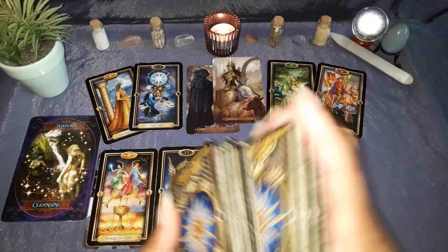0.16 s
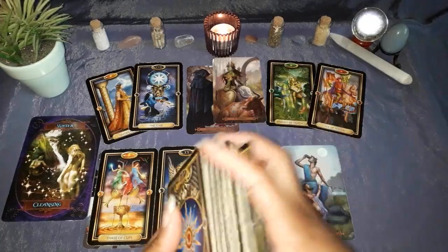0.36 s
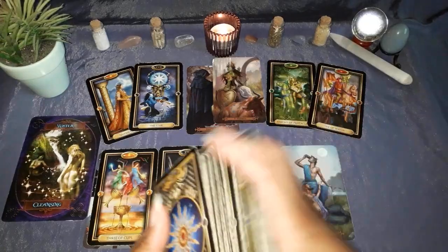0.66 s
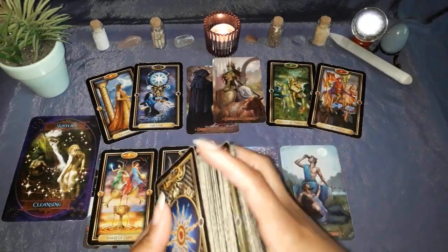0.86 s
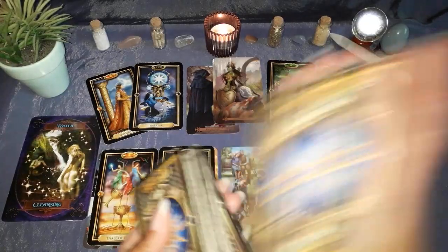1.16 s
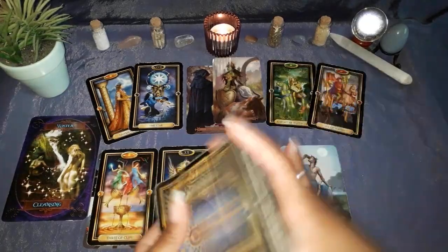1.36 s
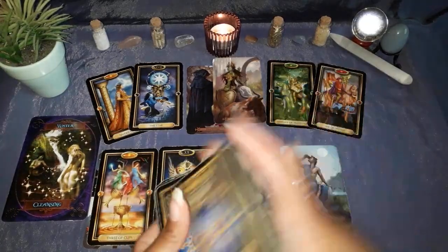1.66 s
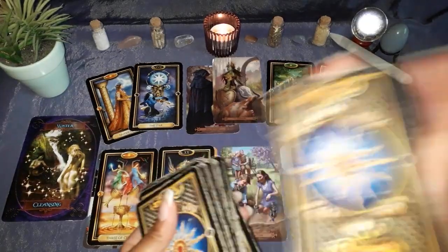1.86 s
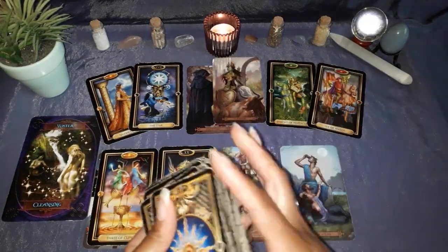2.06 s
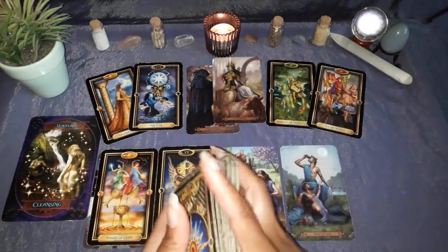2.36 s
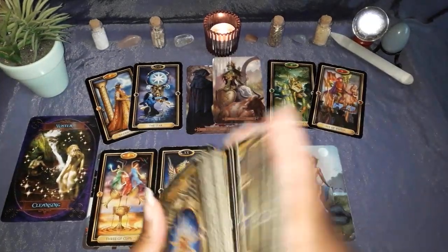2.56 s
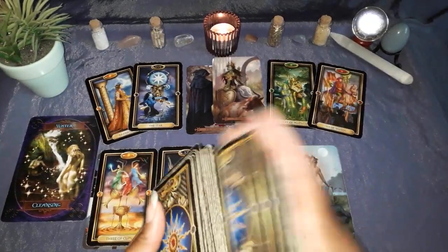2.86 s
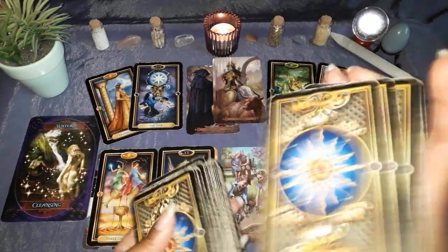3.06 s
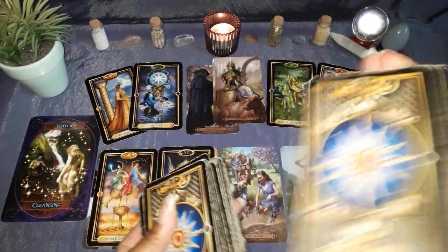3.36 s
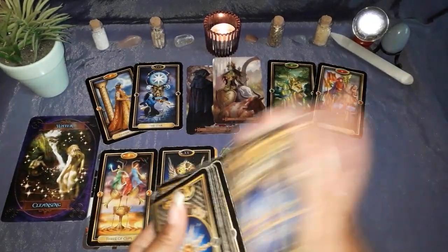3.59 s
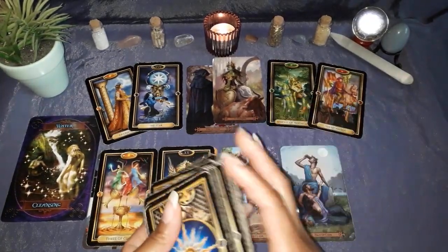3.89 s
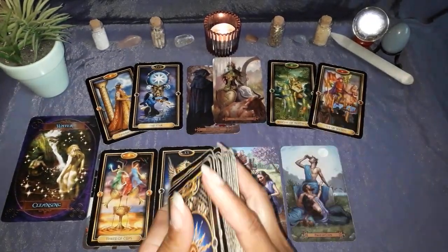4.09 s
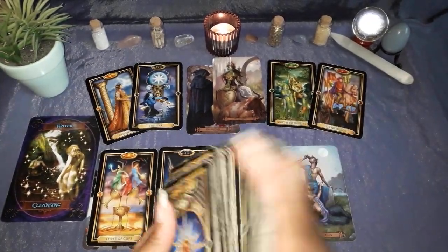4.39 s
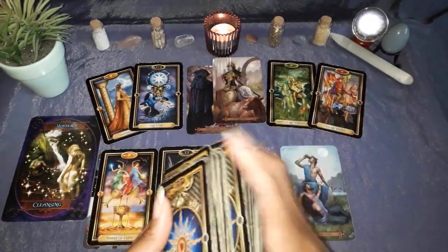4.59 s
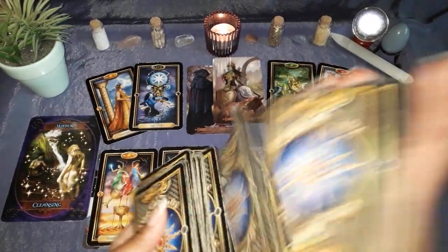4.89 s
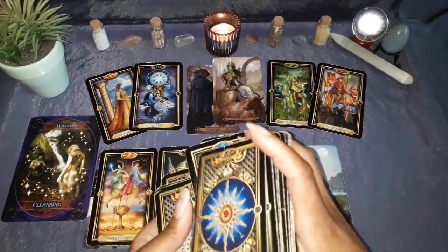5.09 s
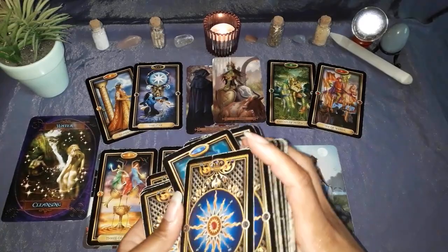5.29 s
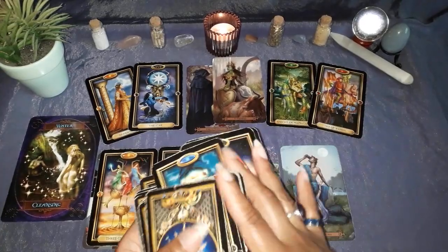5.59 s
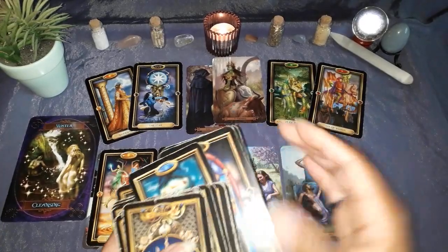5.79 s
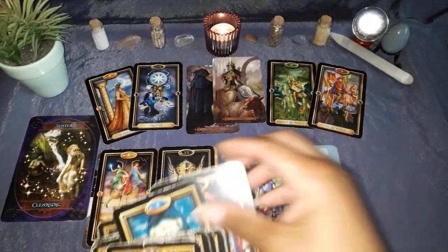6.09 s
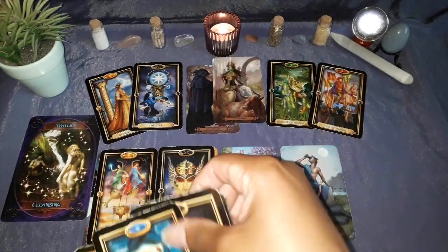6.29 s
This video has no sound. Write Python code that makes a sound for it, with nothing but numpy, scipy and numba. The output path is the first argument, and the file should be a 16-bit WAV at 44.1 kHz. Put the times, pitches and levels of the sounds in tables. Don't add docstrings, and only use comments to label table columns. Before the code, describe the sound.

Stiff cards are shuffled by hand up close, snapping and clacking in uneven bursts with papery scrapes, over faint room hum and distant traffic.

```python
import sys
import numpy as np
from scipy import signal
from scipy.fft import rfft, irfft, next_fast_len
from scipy.io import wavfile
from scipy.ndimage import uniform_filter1d
from numba import njit

SR = 44100
rng = np.random.default_rng(int(sys.argv[2]) if len(sys.argv) > 2 else 0)


def amplitude_ratio(level_db):
    exponent = np.asarray(level_db, float) / 20
    return 10 ** exponent


def waveform_to_disk(signal):
    frames = np.transpose(np.atleast_2d(signal))
    scaled = np.clip(frames, -1, 1) * 32767
    samples = np.round(scaled).astype(np.int16)
    wavfile.write(sys.argv[1], SR, samples)


N = 284133
TIME = np.arange(N) / SR


def unit(x):
    return x / np.sqrt(np.mean(x ** 2))


def colour(x, spectrum):
    size = next_fast_len(len(x))
    hz, db = np.transpose(spectrum)
    bins = np.maximum(np.arange(size // 2 + 1) * SR / size, 1)
    gain = amplitude_ratio(np.interp(np.log(bins), np.log(hz), db))
    return irfft(rfft(x, size) * gain, size)[:len(x)]


def band(x, lo_hz, hi_hz, order=2):
    edges_hz = [lo_hz, min(hi_hz, .45 * SR)]
    return signal.sosfilt(signal.butter(order, edges_hz, "band", fs=SR, output="sos"), x)


def walk(rate):
    hold = int(SR / rate)
    steps = np.repeat(rng.standard_normal(N // hold + 1), hold)
    smooth = uniform_filter1d(uniform_filter1d(steps, hold), hold)
    return unit(smooth[:N])


def ring(t, hz, t60):
    return np.sin(2 * np.pi * hz * t) * amplitude_ratio(-60 * t / t60)


def packet_drops():
    # (time [s], peak level [dB], slot ring [Hz], tick level [dB], rustle level after [dB])
    drops = [(1.077, -53, 1750, 9, -25), (1.1336, -26, 1820, -9, -37), (1.1453, -20.5, 1860, -9.5, -14),
             (1.1444, -21, 5720, -21, -26), (1.3174, -15.5, 1740, -18, -10),
             (1.3238, -18, 1510, -12.5, -19), (1.4282, -30.5, 1810, -7.5, -14),
             (1.4377, -34.5, 1410, -28, 1), (1.6261, -26.5, 1790, -8, -11),
             (1.6332, -16, 1660, -12.5, -12.5), (1.9579, -28.5, 2060, 2.5, -7),
             (2.9824, -38.5, 2190, 3, -2), (2.9964, -21.5, 1690, -23, -8), (3.1557, -18.5, 1740, -10, -10),
             (3.1661, -21.5, 1720, -16, -3), (3.1996, -21.5, 2320, -5, -21),
             (3.2994, -35.5, 1360, -17, -23), (3.472, -26, 2080, -10, -1.5),
             (3.4773, -22.5, 1460, -3.5, -19), (3.6036, -34.5, 3200, -34, -2),
             (5.0117, -8.5, 1760, -20, -13), (5.0171, -10.5, 1790, -3.5, -16),
             (5.0413, -26, 1810, -15, -12), (6.1562, -58.5, 1530, -17, 14.5)]
    return [(s, db, hz, -11.5 - 0.67 * (db + 20), tick_db, rustle_db) for s, db, hz, tick_db, rustle_db in drops]


def flicks():
    # (time [s], peak level [dB], slot ring [Hz], rustle level after [dB])
    flicked = [(1.1129, -29.5, 1850, -20), (1.359, -18, 1740, -17), (1.413, -25, 1000, -22),
               (1.64, -39, 1650, -20), (1.6551, -23, 1990, -24), (1.7292, -36, 2130, -8.5),
               (1.7425, -20, 2360, -16), (1.931, -13, 1990, -9), (2.6928, -32.5, 4340, -14.5),
               (3.0221, -33.5, 1140, -8.5), (3.2122, -26.5, 1370, -26), (3.2826, -38, 2470, -15),
               (3.5124, -23, 2280, -7.5), (3.5503, -20.5, 2110, -15.5), (3.5754, -31.5, 4370, -7.5),
               (3.7486, -27.5, 2140, -16.5), (3.768, -40, 1960, -5), (3.8104, -40, 1730, -3.5),
               (4.025, -33.5, 2560, -15), (4.9637, -37, 1740, -10), (4.9846, -31, 1650, -12.5),
               (4.9988, -32, 1710, -14.5), (5.0519, -19.5, 1540, -16), (5.0568, -23, 1430, -10),
               (5.4079, -34.5, 1840, -14), (5.4983, -26, 1580, -26), (5.5535, -39, 1640, -20),
               (5.5975, -37.5, 4600, -9), (5.608, -32.5, 2130, -14), (6.1882, -26, 1870, -20)]
    return [(s, db, hz, -22.5, -18 + (rustle_db + 15), rustle_db) for s, db, hz, rustle_db in flicked]


def catches():
    # (time [s], peak level [dB], slot ring [Hz], tick level [dB])
    caught = [(0.3727, -44.5, 1430, -8.5), (0.422, -44.5, 1330, -10.5), (0.4894, -51, 1870, -16),
              (0.537, -44, 1040, -27), (0.6868, -52.5, 1670, 8), (0.881, -48.5, 1600, -7),
              (0.904, -51, 1720, 1), (1.218, -46, 1320, -2), (1.9838, -34, 1740, -4.5),
              (2.119, -46, 2340, 4.5), (2.2968, -41.5, 1160, -10.5), (2.4421, -52.5, 1150, 3),
              (2.619, -54, 1230, 4), (2.6465, -39, 4420, -13), (2.6656, -45, 5830, -8),
              (2.8637, -49, 1450, -1.5), (2.8804, -43, 2030, -8), (2.9571, -55, 1220, 9),
              (3.262, -46, 2370, 5), (3.277, -35, 2030, 1), (3.793, -50.5, 1500, 11),
              (3.9494, -44.5, 2200, -3.5), (4.0047, -49, 2240, 10), (4.5296, -45, 2060, -8),
              (4.7696, -59, 1910, 7), (4.7107, -46, 2240, -13), (4.7292, -42.5, 1920, -5),
              (4.8514, -42.5, 1900, 8), (5.649, -43, 1900, -13), (6.1814, -38, 1860, -16)]
    return [(s, db, hz, -13.5, tick_db, -8) for s, db, hz, tick_db in caught]


def packet_edges(chance):
    edges = np.zeros(1024)
    delay = np.cumsum(0.002 * (.2 + chance[1:5]))
    at = np.minimum(delay * SR, 1023).astype(int)
    edges[at] = amplitude_ratio(-9 - 1000 * delay - 6.6 * chance[5:9]) * np.sign(chance[5:9] - .5)
    edges[0] = 1
    return edges


def snaps():
    # (frequency [Hz], level [dB], decay time T60 [s])
    thud_modes = [
        (172, -14.5, 0.02),
        (268, -22, 0.069),
        (548, -2.5, 0.024),
        (660, 10, 0.008),
    ]
    # (frequency [Hz], level [dB], decay time T60 [s])
    upper_modes = [
        (3980, -7.5, 0.0087),
        (7590, -8, 0.0053),
    ]
    slot_t60_s, contact_s = .01, 0.0007
    rustle_t60_s, rustle_rise_s = .075, 0.001

    t = np.arange(2048) / SR
    tick = band(t == 0, 6660, 13360)
    tick = tick / np.abs(tick).max()
    knocks, starts = np.zeros(N + 4096), np.zeros((2, N))
    for s, db, hz, thud_db, tick_db, rustle_db in packet_drops() + flicks() + catches():
        c = rng.random(16)
        slot = ring(t, hz, slot_t60_s) + 1.2 * ring(t, hz * (0.88 + 0.34 * c[10]), 0.36 * slot_t60_s)
        slot = slot * np.minimum(t / contact_s, 1)
        upper = sum(amplitude_ratio(g) * ring(t, f * (0.86 + 0.35 * c[11 + k]), d)
                    for k, (f, g, d) in enumerate(upper_modes))
        thud = sum(amplitude_ratio(g) * ring(t, f * (0.872 + 0.34 * c[12 + k]), d)
                   for k, (f, g, d) in enumerate(thud_modes))
        body = 0.9 * slot + amplitude_ratio(thud_db - 3.5) * thud
        body = body + amplitude_ratio(tick_db + 11) * tick + amplitude_ratio(0.5 * tick_db + 7.0) * upper
        at = int(s * SR)
        knocks[at:at + 3071] += amplitude_ratio(db) * signal.fftconvolve(packet_edges(c), body)
        brightness_db = np.array([0, 0.63 * (tick_db + 4.5)])
        starts[:, at] += amplitude_ratio(db + rustle_db + brightness_db) ** 2
    fade = amplitude_ratio(-120 / (rustle_t60_s * SR))
    rise = np.exp(-1 / (rustle_rise_s * SR))
    rustle_power = signal.lfilter([1 - rise], np.convolve([1, -fade], [1, -rise]), starts)
    return knocks[:N], np.sqrt(rustle_power)


def grit(flicker_db=1.5):
    # (frequency [Hz], level [dB])
    card = [(180, -40), (300, -5), (870, -7), (1480, -2.5), (1610, -2), (1780, -2), (2360, -2.5),
            (3030, -10), (4440, -4), (5900, -9.5), (10400, -8), (14500, -25.5), (16000, -49)]
    slips = np.minimum(rng.exponential(size=N // 8 + 1), 3.5).repeat(8)[:N]
    clicks = rng.standard_normal(N) * amplitude_ratio(2.5 * slips + flicker_db * walk(90))
    sound = unit(colour(clicks, card))
    body = signal.sosfilt(signal.butter(2, 3200, fs=SR, output="sos"), sound)
    return body, sound - body


def sliding(rustle):
    # (middle [s], level [dB], length [s], treble level [dB])
    scrapes = [(0.071, -51.5, 0.042, -0.5), (3.562, -54.5, 0.038, 6.5), (1.398, -54.5, 0.038, 8),
               (0.271, -44.5, 0.022, 1.5), (0.486, -57, 0.011, 1), (0.66, -61, 0.022, 0.5),
               (0.817, -48.5, 0.017, 4), (0.908, -56.5, 0.024, -2.5), (1.022, -49, 0.025, -4.5),
               (1.11, -42, 0.021, -1.5), (1.168, -48.5, 0.025, 2.5), (1.348, -33, 0.0083, 1),
               (1.434, -44.5, 0.0047, 7.5), (1.667, -53.5, 0.02, 6), (3.266, -65, 0.051, 9.5),
               (2.122, -59, 0.0043, 9), (2.677, -65, 0.013, 5), (2.995, -51, 0.017, 3.5),
               (3.201, -38, 0.021, -5), (3.275, -52, 0.013, 7), (3.808, -60, 0.034, 4),
               (4.008, -53.5, 0.035, -1), (4.422, -61.5, 0.024, 4), (4.588, -52.5, 0.026, -4),
               (6.312, -59, 0.06, -2), (4.856, -54, 0.015, 6.5), (5.042, -36, 0.0079, -0.5),
               (5.449, -41.5, 0.031, -8), (5.491, -41, 0.013, -8), (5.611, -51, 0.026, -6)]
    # (time [s], level [dB])
    handling = [(0.14, -68.5), (0.8, -71), (1.0, -61.5), (1.14, -69), (1.3, -91), (1.9, -93),
                (2.121, -51.5), (2.3, -65), (2.98, -63.5), (3.14, -81), (3.75, -82), (3.95, -63),
                (4.68, -74), (4.82, -56.5), (5.12, -77), (5.34, -64.5), (5.53, -56.5), (5.75, -94)]
    s, level_db = np.transpose(handling)
    treble_db = -2 + 0.34 * (level_db + 61.5)
    held = amplitude_ratio(np.interp(TIME, s, level_db, left=-99, right=-99))
    held = held * amplitude_ratio(4 * walk(11))
    held_treble = held * amplitude_ratio(np.interp(TIME, s, treble_db))
    power = np.array([held, held_treble]) ** 2 + rustle ** 2
    for mid, db, length, bright_db in scrapes:
        span = slice(max(int((mid - 4 * length) * SR), 0), int((mid + 4 * length) * SR))
        swell = np.exp(-((TIME[span] - mid) / length) ** 2)
        power[:, span] += np.outer(amplitude_ratio(np.array([db, db + bright_db])) ** 2, swell)
    return np.sum(np.sqrt(power) * grit(), axis=0)


def table_bumps():
    # (time [s], level [dB], frequency [Hz], decay time T60 [s])
    bumps = [
        (.275, -43, 140, .04),
        (1.072, -38, 118, .06),
        (1.1430, -26, 520, .02),
        (1.6290, -33, 270, .04),
        (1.7435, -39, 2500, .15),
        (4.53, -44, 210, 0.045),
    ]
    t = np.arange(4096) / SR
    thumps = np.zeros(N + 4096)
    for s, db, hz, t60 in bumps:
        at = int(s * SR)
        thumps[at:at + len(t)] += amplitude_ratio(db) * ring(t, hz, t60) * np.minimum(t / 0.002, 1)
    return thumps[:N]


@njit
def walls(x, lags, gain, damp):
    line, soft, out = np.zeros((8, 4096)), np.zeros(8), np.zeros(len(x))
    for i in range(len(x)):
        total = 0.
        for k in range(8):
            soft[k] += (1 - damp) * (gain[k] * line[k, (i - lags[k]) & 4095] - soft[k])
            total += soft[k]
        out[i] = total
        for k in range(8):
            line[k, i & 4095] = x[i] + soft[k] - total / 4
    return out


def room_echo(knocks, slides):
    spread = amplitude_ratio(-5) * knocks + amplitude_ratio(5) * slides
    lags = rng.integers(250, 1500, size=8)
    t60_s = .24
    return amplitude_ratio(-26) * walls(spread + 1e-18, lags, amplitude_ratio(-60 * lags / SR / t60_s), .12)


def room_hum():
    # (frequency [Hz], level [dB])
    hum_spectrum = [(18, -32), (40, -17), (70, -4), (153, -2.5), (449, -20.5), (632, -9.5), (866, -3),
                    (1220, -27), (1630, -28), (2290, -24), (2900, -25), (4910, -24), (14800, -29.5),
                    (16000, -36)]
    hum = colour(rng.standard_normal(N), hum_spectrum)
    return hum * amplitude_ratio(-65) / np.std(band(hum, 707, 842))


def traffic():
    # (time [s], nearness [dB])
    passing = [
        (0.0, -6),
        (0.3, -15.5),
        (0.8, -16.5),
        (1.7, -6),
        (2.06, 1),
        (3.73, 3.5),
        (4.18, -2),
        (5.35, -12.5),
        (6.44, -14.5),
    ]
    near_db = np.interp(TIME, *np.transpose(passing))
    rumble_db = -61 + 0.95 * near_db
    drone_db = -64 + 1.1 * near_db
    hiss_db = -60.5 + near_db
    rumble = unit(band(rng.standard_normal(N), 75, 321)) * amplitude_ratio(rumble_db + 1.8 * walk(5.1))
    drone_hz = 73
    tone = np.sin(2 * np.pi * np.cumsum(drone_hz + 2.56 * walk(9)) / SR)
    roughness = unit(band(rng.standard_normal(N), drone_hz - 9, drone_hz + 9))
    drone = unit(tone + 0.27 * roughness) * amplitude_ratio(drone_db + 1.0 * walk(2.1))
    hiss = unit(band(rng.standard_normal(N), 477, 907)) * amplitude_ratio(hiss_db + 0.38 * walk(6.2))
    return rumble + drone + hiss


def scene():
    knocks, rustle = snaps()
    knocks = band(knocks + table_bumps(), 80, SR)
    slides = sliding(rustle)
    mono = knocks + slides + room_echo(knocks, slides) + room_hum() + traffic()
    return np.array([mono, mono])


def band_limit(x):
    return signal.sosfilt(signal.butter(12, 16830, fs=SR, output="sos"), x)


def record(dry):
    heard = signal.sosfilt(signal.ellip(8, .2, 45, 15800, fs=SR, output="sos"), dry)
    soft = .04 * np.tanh(heard[0] / .04)
    waver = (amplitude_ratio(-31) * soft + amplitude_ratio(-25) * band(soft, 2000, 16000)) * walk(400)
    return band_limit(heard + np.array([waver, -waver]))


dry = scene()
out = record(dry)
waveform_to_disk(out)
```